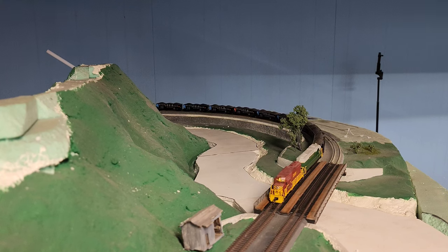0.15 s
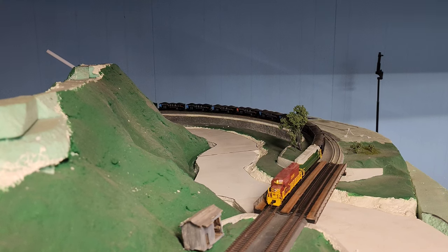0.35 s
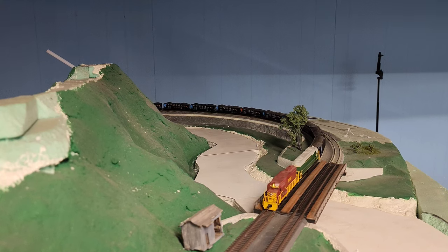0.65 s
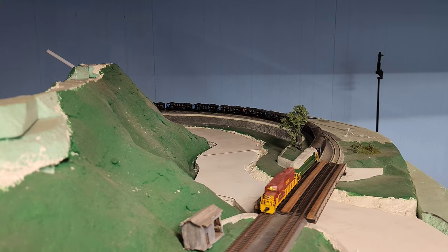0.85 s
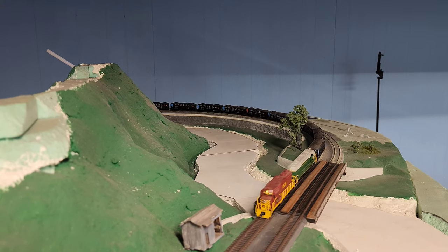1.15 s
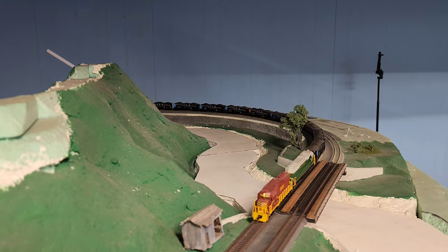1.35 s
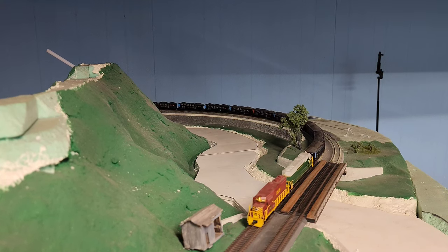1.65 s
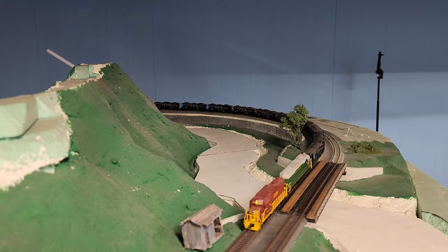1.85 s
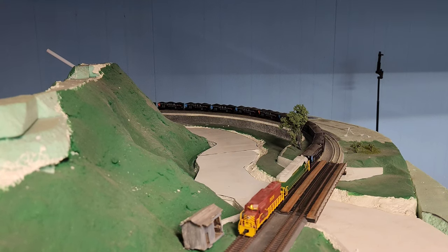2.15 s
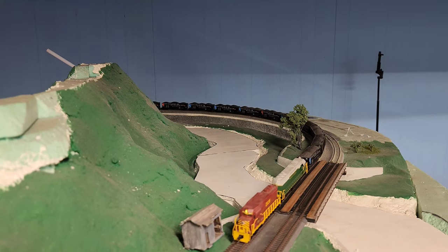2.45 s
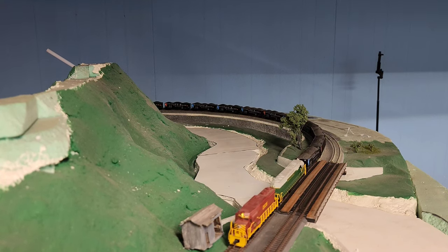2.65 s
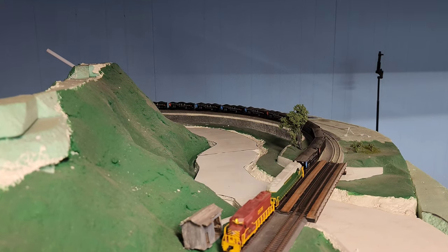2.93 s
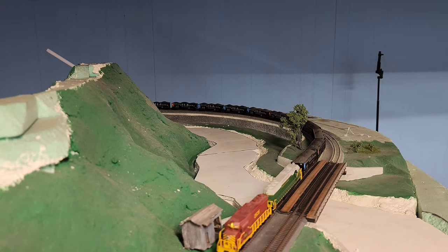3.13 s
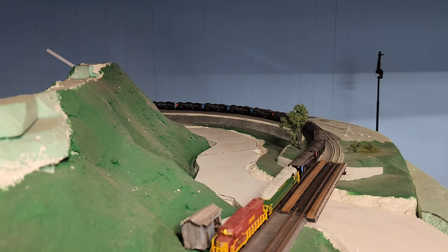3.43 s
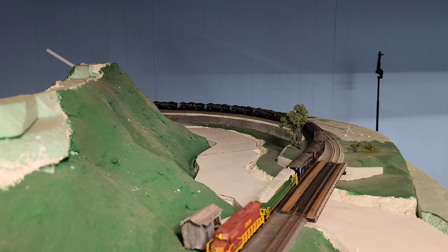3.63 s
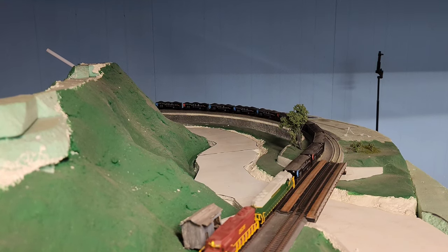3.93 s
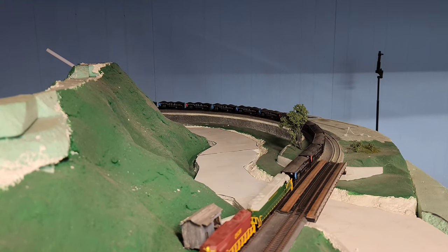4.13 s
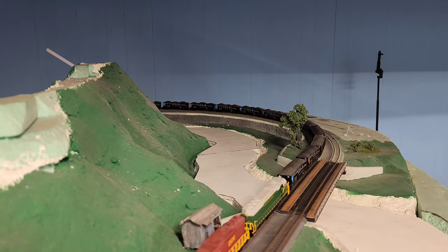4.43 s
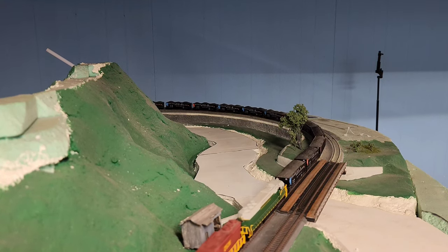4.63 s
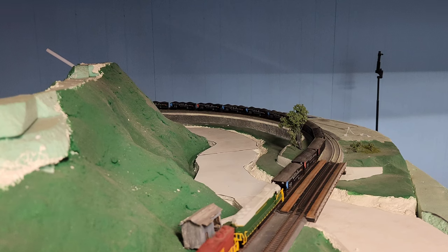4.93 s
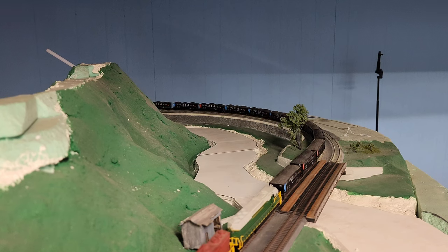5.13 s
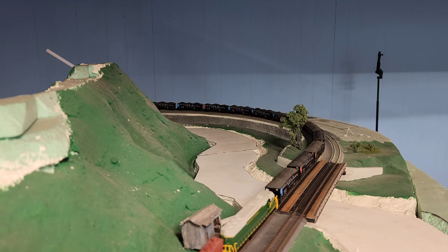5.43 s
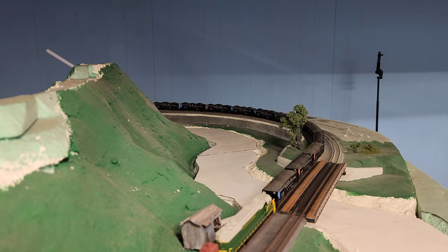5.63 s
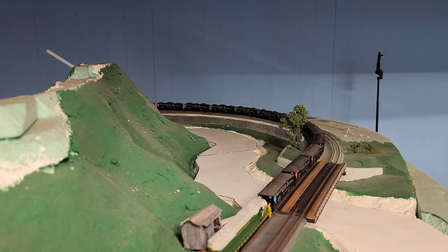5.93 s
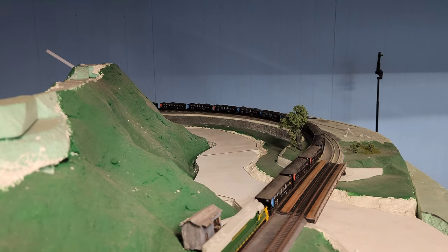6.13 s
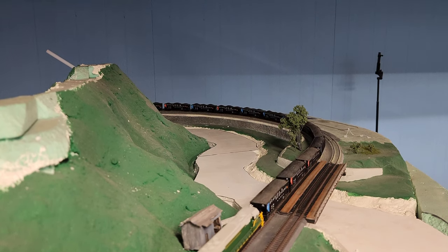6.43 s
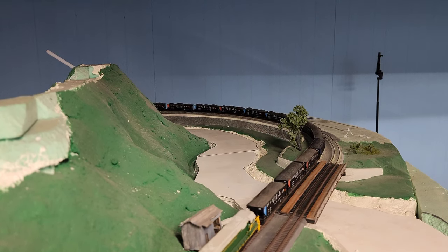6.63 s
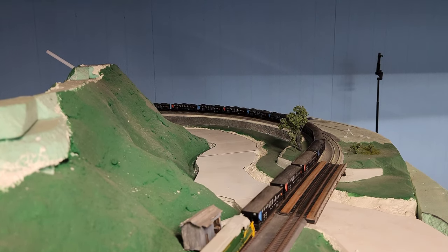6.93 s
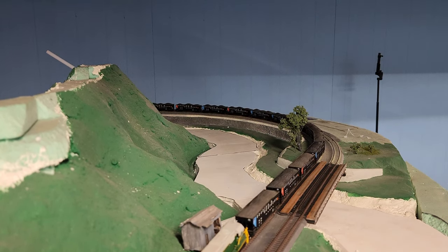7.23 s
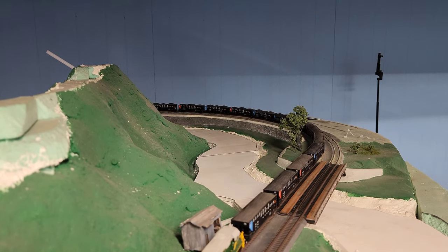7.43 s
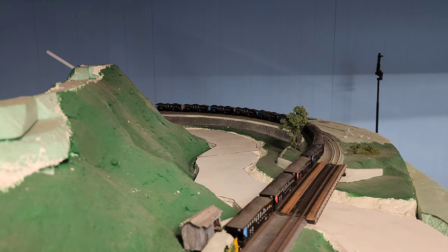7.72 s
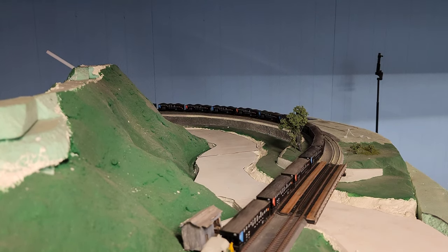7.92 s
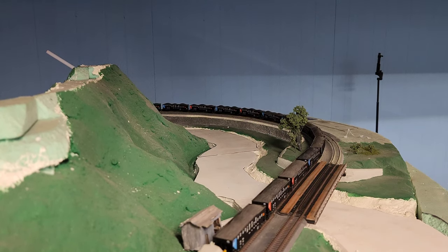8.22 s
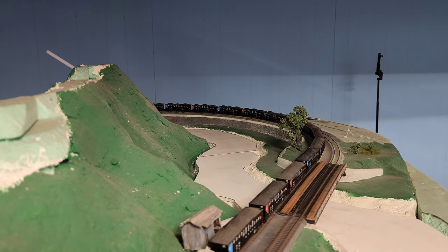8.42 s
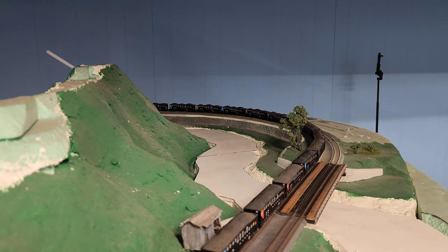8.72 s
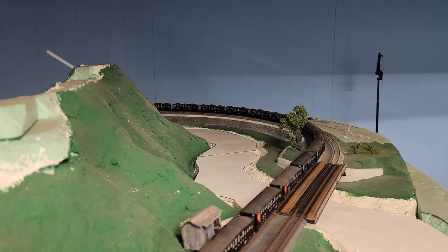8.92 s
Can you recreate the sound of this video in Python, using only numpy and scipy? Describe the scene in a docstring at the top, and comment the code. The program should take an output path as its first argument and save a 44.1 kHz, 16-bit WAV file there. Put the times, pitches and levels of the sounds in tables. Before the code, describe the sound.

A small model train approaches and rolls past, its motor whirring and its little metal wheels hissing and singing on the rails.

```python
"""A model railway in a quiet room. A locomotive pulls wagons round a curve and past the listener.
Its gears whirr in the plastic shell; small metal wheels hiss, tick and sing on the rails.
The baseboard drums, and reflections off it and a hillside sweep notches through the sound.
Thin whines, mains hum and low room noise stand behind the train."""
import sys
import numpy as np
from scipy import signal
from scipy.fft import rfft, irfft, next_fast_len
from scipy.io import wavfile
from scipy.ndimage import map_coordinates

SR = 44100
rng = np.random.default_rng(int(sys.argv[2]) if len(sys.argv) > 2 else 0)


def store_pcm(level_fs):
    """Save levels as 16-bit WAV."""
    pcm = np.round(np.clip(level_fs, -1, 1) * 32767).astype(np.int16)
    wavfile.write(sys.argv[1], SR, np.atleast_2d(pcm).T)


N = 399987

TIME = np.arange(N) / SR


def amp(db):
    """Decibels to gain."""
    return 10 ** (np.asarray(db) / 20)


def unit(x):
    """Scale to rms 1."""
    return x / np.sqrt(np.mean(x ** 2) + 1e-20)


def along(points, hz):
    """(Hz, value) points read on a log axis."""
    f, v = np.transpose(points)
    return np.interp(np.log(hz + 1), np.log(f + 1), v)


def curves(rows):
    """One value per sample for each column after the time."""
    s, *cols = np.transpose(rows)
    return [np.interp(TIME, s, c) for c in cols]


def wobble(rate):
    """A smooth random curve, rate knots a second."""
    knots = rng.standard_normal(int(N * rate / SR) + 4)
    coarse = TIME[::64]
    return np.interp(TIME, coarse, map_coordinates(knots, [coarse * rate]))


def filtered(x, response):
    """x times a response of frequency."""
    m = next_fast_len(N + SR // 4, True)
    return irfft(rfft(x, m) * response(np.fft.rfftfreq(m, 1 / SR)), m)[..., :N]


def colour(points):
    """The response of a (Hz, dB) spectrum."""
    return lambda hz: amp(along(points, hz))


def body(modes):
    """The response of a few resonances with steep skirts."""
    return lambda hz: sum(amp(db) / (1 + ((hz - centre) / (width / 2)) ** 2) for centre, width, db in modes)


def panned(pan_db):
    """Left and right gains of constant power."""
    gains = amp(np.array([pan_db, -pan_db]) / 2)
    return gains / np.sqrt(np.mean(gains ** 2, axis=0))


# Left-right likeness: (frequency [Hz], coherence [0-1])
ALIKE = [(100, .92), (450, .5), (900, .78), (1700, .75), (2250, .9), (3200, .65), (4300, .6), (5800, .8),
         (6600, .7), (7100, .4), (7700, .55), (12000, .35)]

def rub(response, force):
    """Countless tiny contacts of a given force ring a body; stereo, rms 1."""
    def both(hz):
        turn = np.arccos(np.clip(along(ALIKE, hz), 0, 1)) / 2
        return response(hz) * np.array([np.cos(turn), np.sin(turn)])
    mid, side = filtered(force * rng.standard_normal((2, N)), both)
    return unit(np.array([mid + side, mid - side]))


def placed(sound, level_db, pan_db):
    """Give a part its level and direction along the passage."""
    return sound * amp(level_db) * panned(pan_db).reshape(2, -1)


def arch(middle_s, length_s):
    """A gain that swells from 0 to 1 and falls back."""
    return np.cos(np.pi * np.clip((TIME - middle_s) / length_s, -.5, .5))


def nearness_db(closest_s=7.2, closest_m=0.27, speed_m_per_s=0.086):
    """1/distance level of passing wheels, 0 dB when closest."""
    return -20 * np.log10(np.hypot(1, speed_m_per_s * (TIME - closest_s) / closest_m))


def blend(far, near, closeness, force):
    """A body heard partly from afar and partly from close by."""
    share = np.clip(closeness, 0, 1)
    return np.sqrt(1 - share) * rub(colour(far), force) + np.sqrt(share) * rub(colour(near), force)


def drifting_rings(x, depth_db, width_hz, life_s=.7, sag_hz_per_s=54.7):
    """Faint narrow bands come, sink and go."""
    hz, t, spectrum = signal.stft(x, SR, nperseg=2048)
    grid = np.broadcast_arrays((hz[:, None] + sag_hz_per_s * t) / width_hz, t / life_s)
    ripple = map_coordinates(rng.standard_normal((600, 20)), grid, order=1, mode="nearest")
    return signal.istft(spectrum * amp(depth_db * unit(ripple)), SR, nperseg=2048)[1][:, :N]


# Room noise: (frequency [Hz], gain [dB])
ROOM_SPECTRUM = [(15, -32), (30, -33), (62, -6), (100, 2.5), (155, 2.5), (190, -10), (270, -5.5),
                 (400, -7.5), (600, -7), (1500, -41), (8000, -46)]

def room(air_db=-55, hum_db=-54, hum_hz=119.9):
    """Power-supply hum and low room noise."""
    hum = amp(hum_db + 0.58 * wobble(2.64)) * np.sqrt(2) * np.sin(2 * np.pi * hum_hz * TIME)
    return hum + amp(air_db) * rub(colour(ROOM_SPECTRUM), amp(0.54 * wobble(8.4)))


# Faint whines: (frequency [Hz], base level [dB], left minus right [dB])
FAINT_WHINES = [(1013, -62.5, 0), (1254, -57.5, -4), (1350, -55, -4), (1424, -56, -3), (1709, -56, 2),
                (1794, -50, 4), (2509, -46.5, -1), (2525, -46.5, -1), (3418, -55, -3), (3702, -59, 0),
                (4208, -57, -4), (7323, -52.5, -4)]
# Loudest whine: (time [s], level [dB])
MAIN_WHINE_LEVEL = [(0, -38), (.6, -44), (1.5, -42), (2.1, -37.5), (2.8, -47.5), (3.8, -35), (5.1, -35),
                    (5.95, -43), (6.8, -36), (7.8, -37.5), (9.07, -36.5)]
# Low whine: (time [s], level [dB])
LOW_WHINE_LEVEL = [(0, -70), (.7, -63), (2.1, -58.5), (2.7, -67), (4.2, -67), (5.3, -56), (5.8, -81),
                   (9.07, -61)]

def whines(main_hz=1993.5, low_hz=1100, waver_db=2.5, drift_hz=1.186):
    """Thin wavering tones: the faint ones grow as the locomotive nears, two others swell and dip."""
    def wavering(hz):
        gain = amp(waver_db * wobble(4)) * np.sqrt(2)
        return gain * np.sin(2 * np.pi * np.cumsum(hz + drift_hz * wobble(12)) / SR)
    whirr_db = curves(WHIRR_PATH)[0]
    faint = sum(placed(wavering(hz), db, pan_db) for hz, db, pan_db in FAINT_WHINES)
    main = placed(wavering(main_hz), curves(MAIN_WHINE_LEVEL)[0], pan_db=4.5)
    low = wavering(low_hz) * amp(curves(LOW_WHINE_LEVEL)[0])
    return faint * amp(0.31 * (whirr_db - whirr_db.mean())) + main + low


# Wooden deck: (frequency [Hz], gain [dB])
DECK_SPECTRUM = [(30, -26), (60, 2.5), (100, -4), (160, 0.5), (195, -2.5), (250, 1), (300, -7.5), (350, -4),
                 (480, -8), (900, -24)]

def deck(closest_db=-53.5, lumps_db=2):
    """The deck drums unevenly, louder as the train rolls onto it."""
    drumming = rub(colour(DECK_SPECTRUM), amp(lumps_db * wobble(13)))
    return amp(closest_db + 0.64 * nearness_db()) * drumming


# Baseboard bumps: (time [s], relative level [dB], pitch [Hz])
BOARD_BUMPS = [(2.6, -33, 75), (3.093, -40, 340), (4.16, -39, 65), (4.42, -42, 360), (4.619, -39, 139),
               (4.82, -39, 55), (4.969, -38, 90), (5.241, -49, 165), (5.611, -37, 101), (6.35, -39, 255),
               (6.46, -34, 85), (7.75, -40, 95)]

def board_bumps(trim_db=-3, attack_s=0.004, t60_s=0.07):
    """Dull bumps: one damped baseboard mode each."""
    t = np.arange(SR // 4) / SR
    bumps = np.zeros(N + SR)
    for start_s, db, hz in BOARD_BUMPS:
        envelope = amp(db + trim_db - 60 * t / t60_s) * (1 - np.exp(-t / attack_s))
        bumps[round(start_s * SR):][:len(t)] += envelope * 2 * np.sin(2 * np.pi * hz * t)
    return bumps[:N]


# Ticks at rail flaws: (time [s], relative level [dB])
RAIL_TICKS = [(1.3009, -34), (3.2331, -24), (5.8396, -19), (7.6261, -38)]

def wheel_ticks(trim_db=-5, t60_s=.02):
    """Wheels strike flaws in the rail: bright noise bursts."""
    t = np.arange(SR // 4) / SR
    ticks = np.zeros((2, N + SR))
    for start_s, db in RAIL_TICKS:
        envelope = amp(db + trim_db - 60 * t / t60_s)
        ticks[:, round(start_s * SR):][:, :len(t)] += envelope * rng.standard_normal((2, len(t)))
    return filtered(ticks[:, :N], colour([(1500, -24), (6000, -9), (9000, -3), (15000, 0)]))


# Binding wheels, plus one brief tightening of the gear whirr near 2.17 kHz: (middle [s], length [s], pitch
# [Hz], sag [Hz/s], fuzz [Hz], level [dB], pan [dB])
NARROW_RINGS = [(.6, 2.8, 4825, 75, 120, -40.5, 16), (1.05, 1.1, 2166, 50, 160.2, -35.5, 17),
                (1.2, 0.66, 6060, 300, 322, -36, 15), (1.7, .7, 6430, 297, 349, -40, 23),
                (1.602, .6, 5240, 200, 205, -40, -2), (2.402, 2.8, 4015, 55.3, 79.7, -43, -6),
                (2.75, 1.7, 4890, 100, 100, -39.5, 13), (3.6, 1.6, 4820, 51.3, 130, -39, -17),
                (3.198, .9, 3320, 51, 199, -43, -13), (3.697, 1.4, 5320, 49.4, 297, -41, -15),
                (3.6, 1.1, 3890, 109, 110.6, -40.5, 1), (4.149, 1.3, 6270, 48.7, 650, -31.5, 12),
                (4.4, 1.4, 5420, 88.4, 347, -40, 8), (4.9, 1.2, 7760, 246, 171, -45, 16),
                (5.048, .8, 6360, 200, 110, -37.5, 16), (5.352, 1.4, 3920, 89, 99.6, -41.5, -10),
                (5.296, 1.2, 4900, 59.6, 101, -42, -8), (5.697, .8, 6230, 149, 119.7, -37, 14),
                (5.899, 1.6, 3316, 70, 100, -36.5, -27), (5.9, .9, 7600, 199, 130, -44, 16),
                (6.3, 0.91, 6120, 102, 110.3, -38.5, 12), (6.748, 1, 4970, 40, 120, -38.5, 20),
                (6.801, 1.6, 3690, 61, 80.4, -44, -19), (7.501, 1.6, 3380, 30, 100.3, -40, -8),
                (7.65, 1.1, 4865, 50, 89, -42, 18), (7.899, 1.9, 6180, 39, 131.6, -36.5, -14),
                (8.2, 1.8, 3840, 40, 80, -41, -12), (8.698, 1.6, 3425, 29.6, 99.5, -42, 8),
                (8.903, 1, 4940, 80, 101.5, -35, 23)]

def wheel_singing():
    """Binding wheels sing and the whirr tightens once: each a fuzzy narrow ring that swells, sinks and fades."""
    rings = np.zeros((2, N))
    for middle_s, length_s, hz, sag_hz_per_s, fuzz_hz, db, pan_db in NARROW_RINGS:
        during = np.abs(TIME - middle_s) < length_s / 2
        t = TIME[during] - middle_s
        in_phase, quadrature = [map_coordinates(knots, [(t + length_s / 2) * fuzz_hz])
                                for knots in rng.standard_normal((2, SR // 8))]
        phase = 2 * np.pi * (hz - sag_hz_per_s * t / 2) * t
        ring = in_phase * np.cos(phase) + quadrature * np.sin(phase)
        rings[:, during] += placed(ring * np.cos(np.pi * t / length_s), db, pan_db)
    return rings


# Treads far and close, fizz of the train's front, fine wagon hiss: (frequency [Hz], gain [dB])
TREAD_FAR_SPECTRUM = [(2300, -21.5), (2900, -12), (3400, -6), (4300, -4.5), (4550, -5), (4870, -9),
                      (5170, -7), (5450, 4), (5750, -1), (6150, 0.5), (6550, -2.5), (6980, -10),
                      (7400, -7.5), (8600, -53)]
TREAD_NEAR_SPECTRUM = [(2300, -21.5), (2900, -5), (3500, -7.5), (4450, -9), (4700, 0), (4920, -1),
                       (5170, -2), (5480, -1.5), (5800, -2), (6250, 2), (6550, -1.5), (6980, -12.5),
                       (7400, -26), (8600, -50)]
FIZZ_SPECTRUM = [(6000, -29), (7000, -15.5), (7350, 8.5), (7650, -0.5), (8150, -1.5), (8650, -16.5),
                 (9200, -8), (9900, -19.5), (10600, -14), (11200, -20), (11700, -13.5), (13000, -17),
                 (14900, -35), (15600, -58)]
WAGON_HISS_SPECTRUM = [(8400, -30), (9300, 0), (9900, -9), (10600, 6.5), (11200, -11), (11800, -1),
                       (12800, -5), (15000, -24)]
# Rail, flange and wagon modes: (frequency [Hz], width [Hz], gain [dB])
RAIL_RESONANCES = [(3780, 170, -2), (4015, 110, 5), (4280, 220, -0.5)]
FLANGE_RESONANCES = [(4790, 200, -1), (4970, 220, -2)]
WAGON_RESONANCES = [(3240, 140, 4.4), (3394, 120, 2)]

def wheels(shaft_load, throb_db=0.53, flutter_db=0.5, shake_db=0.98, grit_db=1.5):
    """Wheels roll on uneven, gritty rail: treads hiss; rails, flanges and wagons ring."""
    sway_db = throb_db * shaft_load + flutter_db * wobble(24)
    force = lambda: amp(sway_db + shake_db * (wobble(30) + wobble(120)))  # fresh shake per part
    grit = amp(grit_db * rng.standard_normal(N))
    near_share = 0.91 * (1 + np.tanh((TIME - 4.05) / 0.85)) / 2
    treads = blend(TREAD_FAR_SPECTRUM, TREAD_NEAR_SPECTRUM, near_share, force() * grit)
    treads = placed(treads, -28 + nearness_db(), pan_db=7 - 0.77 * TIME)
    # rails and flanges ring most early on, in the curve
    rails = placed(rub(body(RAIL_RESONANCES), force()), -37.5 - 1.7 * TIME, pan_db=-3.5)
    flanges = placed(rub(body(FLANGE_RESONANCES), force()), -38.5 - 0.5 * TIME, pan_db=-1)
    wagons = placed(rub(body(WAGON_RESONANCES), force()), -51.5 + 1.5 * TIME, pan_db=-20)
    front_db = nearness_db(closest_s=6.7)
    fizz_db = -37 + 1.14 * front_db + 3 * arch(middle_s=1.73, length_s=2)
    fizz = placed(rub(colour(FIZZ_SPECTRUM), force() * grit), fizz_db, pan_db=8 + 0.93 * front_db)
    hiss_db = -47.5 + 1.5 * (TIME - TIME[-1])
    hiss = placed(rub(colour(WAGON_HISS_SPECTRUM), force() * grit), hiss_db, pan_db=6)
    rolling = drifting_rings(treads + rails + flanges + wagons + fizz, depth_db=1.5, width_hz=60)
    return rolling + hiss + amp(sway_db) * wheel_singing()


def rotating_load(turn_hz, size_by_order, speed_jitter=0.0057):
    """A rotating part binds at the same angles every turn: load swing, rms 1."""
    angle = 2 * np.pi * np.cumsum(turn_hz * (1 + speed_jitter * wobble(2.02))) / SR
    return unit(sum(size * np.cos(order * angle + rng.uniform(0, 2 * np.pi))
                    for order, size in size_by_order.items()))


# Gears catch for an instant: (time [s], lift [dB])
GEAR_CATCHES = [(.693, 2.5), (1.047, 3.5), (1.307, 4), (1.399, 3.5), (1.448, 3), (1.789, 4), (1.988, 3),
                (2.082, 4), (2.577, 3.5), (4.206, 4), (4.685, 5.5), (4.976, 4), (5.029, 3), (5.176, 3),
                (5.235, 3), (5.28, 3.5), (5.45, 3), (6.046, 4), (6.1, 3), (6.236, 3), (6.49, 3),
                (6.842, 4.5), (7.586, 4.5), (7.927, 3), (8.177, 4), (8.361, 3), (8.582, 3.5), (8.917, 4),
                (8.944, 4.5)]
# Gears labour or run free: (middle [s], lift [dB])
GEAR_SURGES = [(.42, -1.5), (.61, -1.8), (1.07, 1.2), (1.26, -1.7), (2.14, 1.3), (2.45, -1.8), (3.42, -1.5),
               (3.97, 1.7), (4.15, -2.4), (4.61, -1.6), (5.57, -2.2), (6.32, -1.5), (6.86, 1.3), (7.05, -2),
               (7.41, -2), (7.73, -2), (8.47, -2.2)]

def gear_force(shaft_load, motor_hz=84.2, axle_hz=2.8, catch_rise_s=0.0076, catch_fall_s=0.015):
    """Tooth force throbs with shaft and axle load; the motor jolts it once a turn."""
    jolt = .5 - np.cumsum(motor_hz * (1 + .015 * wobble(3))) / SR % 1
    axle_load = rotating_load(axle_hz, {1: .3, 3: .9, 5: 1.3, 7: .8})
    throb_db = .35 * shaft_load + .45 * axle_load + 1.7 * jolt + .25 * wobble(28)
    catch_db = sum(np.interp(TIME, [s - catch_rise_s, s, s + catch_fall_s], [0, db, 0])
                   for s, db in GEAR_CATCHES)
    surge_db = sum(db * arch(s, length_s=.1) for s, db in GEAR_SURGES)
    chatter_db = 0.24 * wobble(130)
    return amp(throb_db + catch_db + surge_db + chatter_db)


# Shell far and close, plywood baseboard: (frequency [Hz], gain [dB])
SHELL_FAR_SPECTRUM = [(900, -45.5), (1450, -46), (1700, -7), (1900, -3), (2050, 4), (2190, 3.5), (2370, -6),
                      (2550, -0.5), (2750, -8), (3000, -13), (4000, -63)]
SHELL_NEAR_SPECTRUM = [(1000, -43), (1650, -18), (1900, -8.5), (2080, 2), (2200, 7), (2300, 6.5),
                       (2420, 4.5), (2620, -13), (2800, -10.5), (3100, -28), (4000, -56)]
BOARD_SPECTRUM = [(200, -50), (450, -21.5), (610, -28), (690, -9.5), (840, -11.5), (1020, -7.5), (1160, -7),
                  (1350, 0), (1650, 6.5), (2000, 0), (3000, -24.5)]
# Close spectrum's part in the shell sound: (time [s], share [0-1])
SHELL_NEAR_SHARE = [(0, 0.27), (3, 0.22), (4.5, 0.34), (7.2, 0.32), (8, 0.8), (9.07, 0.75)]
# Whirr of the nearing locomotive: (time [s], relative level [dB], relative pan [dB])
WHIRR_PATH = [(0.0, -32, 0.0), (0.2, -33.5, -3), (0.5, -33.5, -2), (1.1, -30.5, -1.5), (2.88, -29.5, -5.5),
              (3.86, -25, -2.5), (4.8, -22.5, -1.5), (5.76, -24.5, 1.5), (7.5, -24.5, 1.5),
              (8.64, -22.5, -3), (9.07, -24, -4.5)]
# Sharpest shell modes: (frequency [Hz], width [Hz], gain [dB])
SHELL_RESONANCES = [(2178, 95, -3.5), (2294, 95, 4)]
# Their ring, strongest at close range: (time [s], level [dB])
SHELL_RING_LEVEL = [(0, -47), (3.4, -36.5), (4.7, -26.5), (5.6, -35), (7.3, -32.5), (7.8, -25.5),
                    (9.07, -20)]

def gears(shaft_load):
    """Gear teeth rattle the plastic shell and the baseboard; the ring narrows at close range."""
    force = gear_force(shaft_load)
    whirr_db, whirr_pan_db = curves(WHIRR_PATH)
    shell = blend(SHELL_FAR_SPECTRUM, SHELL_NEAR_SPECTRUM, curves(SHELL_NEAR_SHARE)[0], force)
    shell = drifting_rings(shell, depth_db=.9, width_hz=45)
    shell = placed(shell, whirr_db + 1.26, whirr_pan_db - 3.5)
    board = rub(colour(BOARD_SPECTRUM), np.sqrt(force))  # its mass evens out the throb
    board_db = -35.5 + 0.22 * (whirr_db - whirr_db.mean())
    board = placed(board, board_db, pan_db=-3.5 + 0.3 * TIME)
    ring = placed(rub(body(SHELL_RESONANCES), force), curves(SHELL_RING_LEVEL)[0], pan_db=-10)
    return shell + board + ring


def delayed(x, ms):
    """x with a delay that changes from moment to moment."""
    return map_coordinates(x, [np.arange(N) - ms * SR / 1000], order=3)


# Microphone pair balance: (frequency [Hz], pan [dB])
MIC_BALANCE = [(200, -3), (900, 4), (1300, -6), (1600, 3), (1880, 11), (2200, 0.5), (2900, 5.5), (3500, -1),
               (4500, -3), (4900, 2), (5600, 0), (7300, -2.5), (9500, 0), (12500, -8.5)]
# Phase shift from its housing: (frequency [Hz], right lead [rad])
MIC_PHASE = [(300, -0.05), (1000, 0.06), (1250, -0.2), (1550, -2), (1950, 0.5), (2400, 0.04), (3000, -1),
             (3700, -0.3), (4400, 1.63), (6500, 0.12), (7400, 4.5), (10000, 3.5)]
# Sound paths at start and end: (right lead [ms], baseboard reflection delay [ms])
GEAR_DELAYS = [(.055, .95), (-.075, 1.37)]
WHEEL_DELAYS = [(.06, .33), (-.155, .89)]

def passage(source, delays, board_gain=.19, hill_gains=(.16, .09)):
    """Baseboard and hillside reflections lag ever more: notches fall while the direction turns."""
    def mic_response(hz):
        return panned(along(MIC_BALANCE, hz)) * np.exp(np.array([[-.5j], [.5j]]) * along(MIC_PHASE, hz))
    progress = 1 - (1 - np.arange(N) / N) ** 1.6
    lead_ms, board_ms = [start + (end - start) * progress for start, end in zip(*delays)]
    hill_ms = 2.47 + .097 * TIME
    channels = []
    for x, side, hill_gain in zip(filtered(source, mic_response), (1, -1), hill_gains):
        direct_ms = side * lead_ms / 2
        heard = delayed(x, direct_ms)
        heard += board_gain * delayed(x, direct_ms + board_ms)
        heard += hill_gain * delayed(x, direct_ms + hill_ms)
        channels.append(heard / np.sqrt(1 + board_gain ** 2 + hill_gain ** 2))
    return np.array(channels)


# Interference bands: (middle [s], length [s], centre [Hz], sag [Hz/s], width [Hz], gain [dB])
INTERFERENCE_BANDS = [(1.32, 1.9, 1590, 155, 150, -10), (2.03, 1.4, 1370, 120, 130, -6),
                      (1.9, 4.7, 1210, 40, 100, -8.5), (1.9, 2.3, 2600, 90, 90, -9),
                      (2.6, 1.3, 1700, 33, 80, 4), (3.4, 1, 2600, 60, 91, 4.5),
                      (3.8, 2.4, 1700, 90, 134, -12), (4, 1.6, 4500, 60, 180, -5),
                      (4.6, 2.9, 2700, 31, 70, -7), (4.55, 2, 1370, 40, 100, -6.5),
                      (5, 2.6, 2400, 38, 90, -5), (5.4, 2.7, 3300, 90, 160, -5.5),
                      (6.64, 3.4, 2770, 40, 110, 8), (7.4, 4.1, 2570, 35, 76, -11),
                      (7.8, 3.3, 796, 0, 56, -5), (3.4, 1.6, 4440, 60, 160, -8),
                      (6.2, 2.2, 4400, 60, 250, -7), (5.9, 1.8, 5040, 60, 230, -7),
                      (7.1, 1.6, 5800, 60, 200, -6), (5, 1.3, 6300, 60, 140, 5),
                      (5.9, 1.8, 7000, 80, 310, 4), (3, 1.2, 4210, 0, 70, 9)]
# Phase shift of the close wagons: (frequency [Hz], extra right lead [rad])
CLOSE_PHASE = [(2900, 0), (3300, 2.4), (3700, 3), (4000, 2.1), (4400, 0)]

def reflection_bands(train, phase_ramp_s=(2.5, 5.5)):
    """The moving train's reflections cancel or reinforce sinking bands and shift its phase."""
    hz, t, spectrum = signal.stft(train, SR, nperseg=2048)
    gain_db = np.zeros(spectrum.shape[1:])
    for middle_s, length_s, centre_hz, sag_hz_per_s, width_hz, db in INTERFERENCE_BANDS:
        detuning = (hz[:, None] - centre_hz + sag_hz_per_s * (t - middle_s)) / (width_hz / 2)
        gain_db += db * np.interp(t, TIME, arch(middle_s, length_s)) * .5 ** (detuning ** 2)
    lead_rad = along(CLOSE_PHASE, hz)[:, None] * np.interp(t, phase_ramp_s, [0, 1])
    rotation = np.exp(.5j * np.array([-lead_rad, lead_rad]))
    return signal.istft(spectrum * amp(gain_db) * rotation, SR, nperseg=2048)[1][:, :N]


def scene():
    """The passing train over the room; one drive shaft modulates gears and wheels."""
    shaft_load = rotating_load(turn_hz=15.9, size_by_order={1: .6, 2: 1, 3: .65, 4: .3, 6: .35, 8: .5})
    whirr = passage(gears(shaft_load), GEAR_DELAYS)
    rolling = passage(wheels(shaft_load), WHEEL_DELAYS)
    train = reflection_bands(whirr + rolling + whines())
    return train + deck() + wheel_ticks() + board_bumps() + room()


def record(dry):
    """Brick-wall low-pass at 15.4 kHz."""
    return filtered(dry, lambda hz: hz < 15400)


dry = scene()
out = record(dry)
store_pcm(out)
```